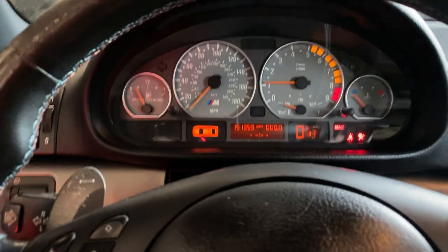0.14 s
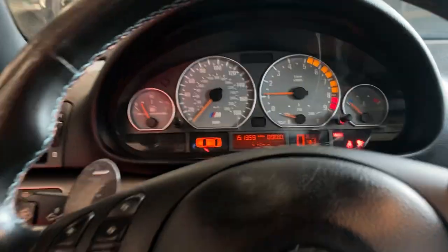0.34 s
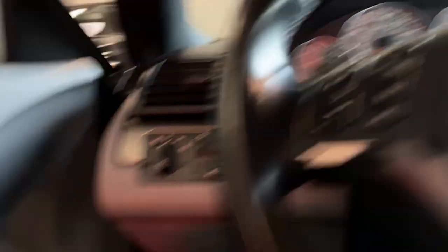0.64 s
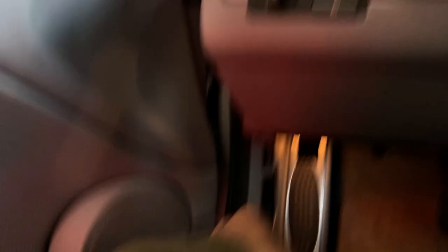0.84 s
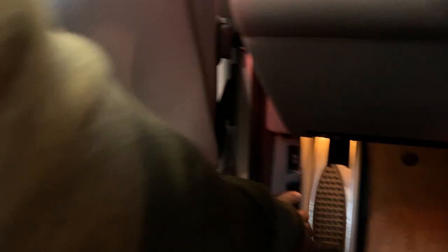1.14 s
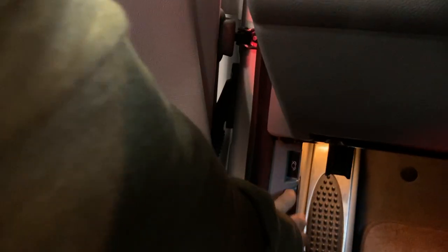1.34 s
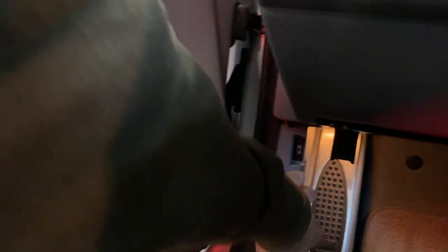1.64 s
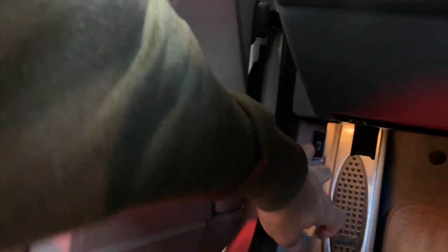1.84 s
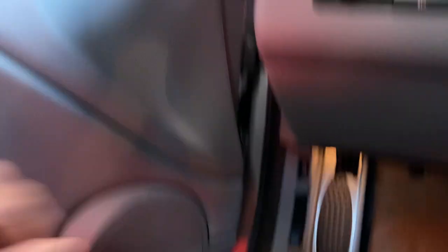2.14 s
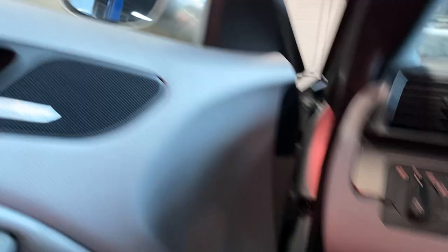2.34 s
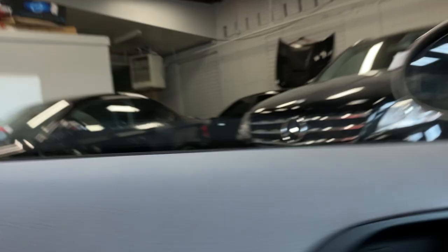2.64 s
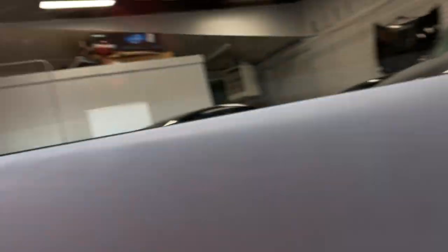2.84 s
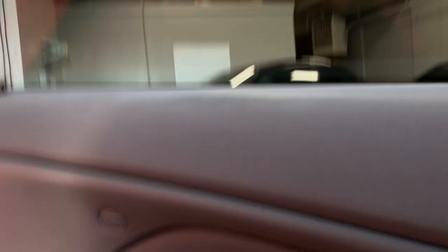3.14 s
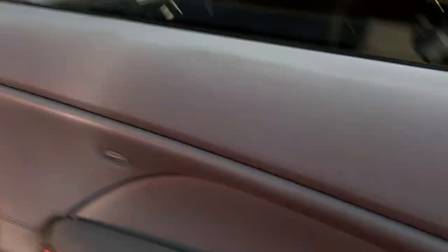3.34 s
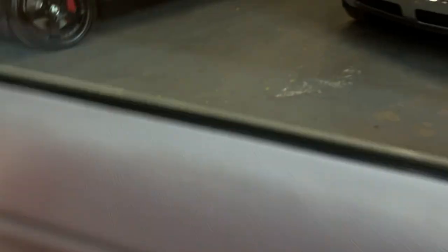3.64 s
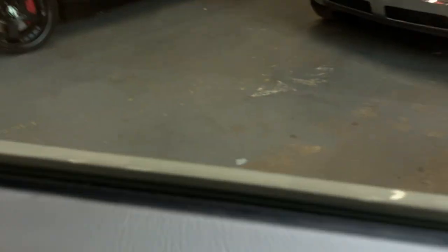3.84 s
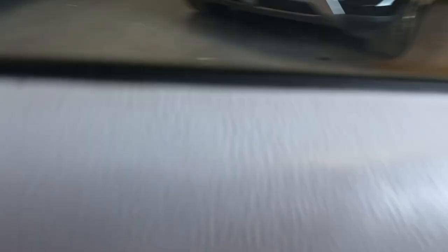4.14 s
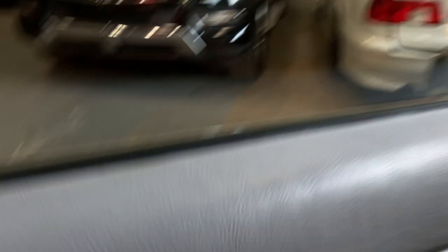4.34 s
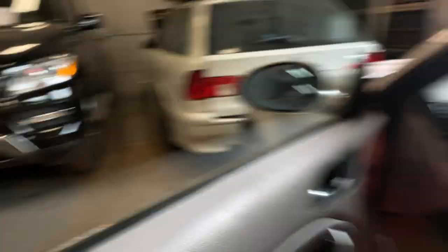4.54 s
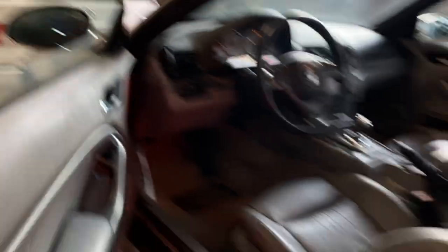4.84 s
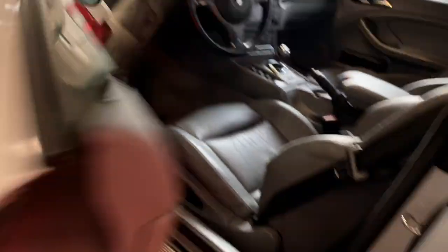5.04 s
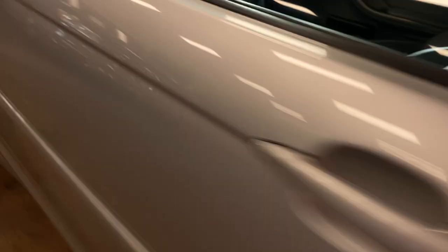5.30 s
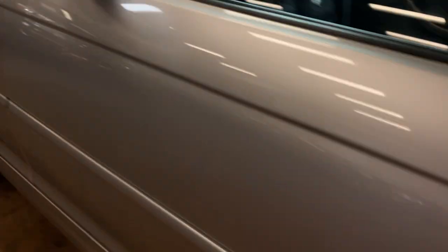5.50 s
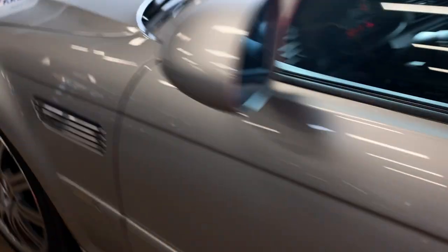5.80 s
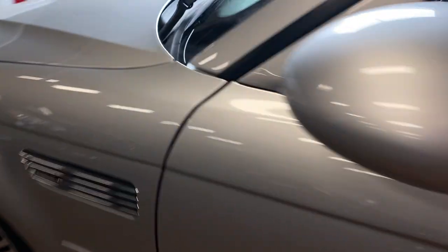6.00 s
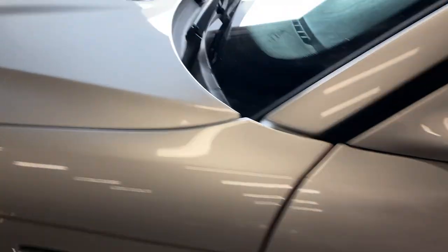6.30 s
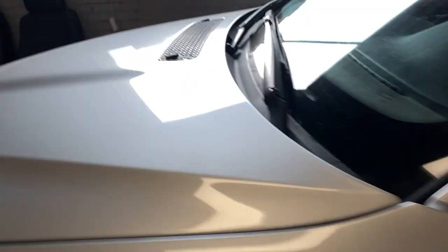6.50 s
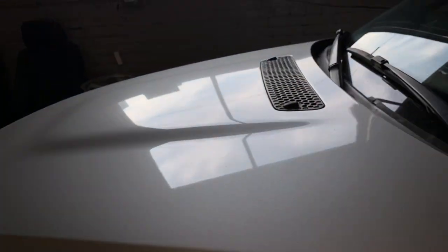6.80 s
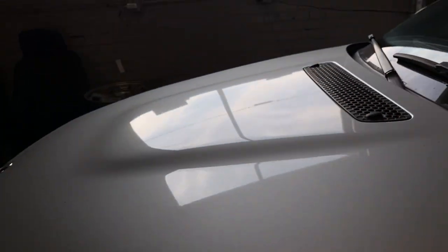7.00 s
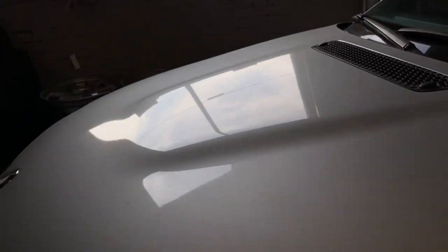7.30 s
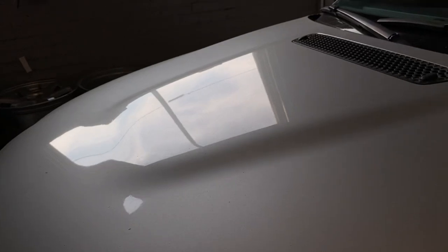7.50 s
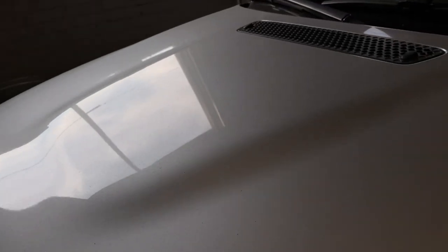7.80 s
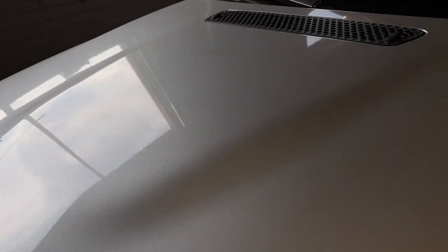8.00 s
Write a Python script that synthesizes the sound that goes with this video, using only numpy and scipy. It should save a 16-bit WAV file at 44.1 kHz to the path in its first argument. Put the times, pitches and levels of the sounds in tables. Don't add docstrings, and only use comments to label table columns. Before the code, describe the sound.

Inside a car, a six-cylinder engine idles with a smooth low boom. Trim ticks and cloth rustles, then a lever creaks, snaps and the bonnet pops with a heavy thunk. The door latch cracks, the door knocks open, then slams. Outside, valve clatter and belt whir grow brighter near the bonnet. Close handheld phone in a reverberant workshop, briefly ducking after the loud pop.

```python
import sys
import numpy as np
from scipy import signal
from scipy.fft import rfft, irfft, next_fast_len
from scipy.io import wavfile
from scipy.ndimage import uniform_filter1d, map_coordinates

SR = 44100
rng = np.random.default_rng(int(sys.argv[2]) if len(sys.argv) > 2 else 0)


def store_wav(level_fs):
    pcm = np.round(np.clip(np.atleast_2d(level_fs), -1, 1) * 32767)
    wavfile.write(sys.argv[1], SR, pcm.T.astype(np.int16))


def ratio(d):
    e = np.asarray(d, float) / 20
    return 10 ** e


N = 359415

# frequency in Hz, density in dB per Hz.
HISS_SPECTRUM = [(2500, -32), (4000, -3), (5500, -9), (7500, -10), (9500, -7.5), (10500, -6), (12000, -9.5),
                 (14000, -11), (15800, -18)]
# time in seconds, distance in m.
BAY_DISTANCE = [(0, 3.5), (5, 3.85), (6.4, 1.56), (7.45, 0.87), (8.15, 1.3)]


def unit(x):
    return x / np.sqrt(np.mean(x ** 2) + 1e-20)


def along(points, hz):
    f, v = np.transpose(points)
    return np.interp(np.log(hz + 1), np.log(f + 1), v)


def curve(rows):
    s, value = np.transpose(rows)
    return np.interp(np.arange(N) / SR, s, value)


def wobble(rate_hz):
    knots = rng.standard_normal(int(N * rate_hz / SR) + 4)
    return map_coordinates(knots, [np.arange(N) * rate_hz / SR])


def filtered(x, response):
    m = next_fast_len(N + SR // 2)
    return irfft(rfft(x, m) * response(np.fft.rfftfreq(m, 1 / SR)), m)[..., :N]


def peak(f, hz, width_hz):
    return 1j * f * width_hz / (hz * hz - f * f + 1j * f * width_hz)


def pair(spectrum, beat_db=0, patchy_db=1, size=512):
    # frequency in Hz, likeness of the ports (0 to 1).
    likeness = [(60, 0.93), (250, 0.47), (600, 0.19), (1500, 0.31), (4000, 0.077), (9000, 0.74), (14000, 1)]
    z = signal.stft(rng.standard_normal((2, N)) * ratio(beat_db), nperseg=size)[2]
    field = uniform_filter1d(rng.standard_normal(z.shape[1:]), size=3, axis=0)
    field = uniform_filter1d(field, size=10, axis=1)
    both = signal.istft(z * ratio(patchy_db * unit(field)), nperseg=size)[1][:, :N]

    def mid_side_response(hz):
        turn = np.arccos(np.clip(along(likeness, hz), 0, 1)) / 2
        return ratio(along(spectrum, hz)) * [np.cos(turn), np.sin(turn)]

    mid, side = filtered(both, mid_side_response)
    return unit(np.array([mid + side, mid - side]))


def spots(name):
    # centre in seconds, width in seconds, change in dB.
    order_spots = dict( second=(-42.5, [(.05, .2, -36), (2.35, 0.29, -8), (3.0, 0.45, 7), (5.0, 0.16, 10.5),
                   (6.2, 0.74, 13.5), (8.1, 0.54, 11.5)]), half=(-42, [(.2, .3, 3), (3.6, .35, 5),
                   (6.1, .3, -4), (7.7, 1, 11.5)]), third=(-35, [(.55, 0.17, -16), (1.3, 0.89, 3),
                   (2.8, 0.2, -3), (7.2, 0.99, -4.5)]), fourth=(-48.5, [(1.2, 0.62, 8), (6.9, 0.42, 12.5)]),
                   fifth=(-53, [(.05, .2, 12.5), (1.45, 0.081, 3), (3.2, 0.38, 8), (4.35, 0.34, 10.5),
                   (5.2, 0.23, 10), (6.0, 0.33, 10.5), (7.0, 0.5, 11)]))
    # centre in seconds, width in seconds, change in dB.
    part_spots = dict( pump=(-56.5, [(1.5, 0.74, 9), (4.5, 0.6, 7), (5.3, 0.52, 9.5), (7.3, 0.33, 9.5)]),
                  fan=(-59.5, [(1.3, 0.7, 14.5), (3.95, 0.19, 11.5), (4.6, 0.49, 6.5), (5.3, 0.35, 13.5),
                  (6.1, 0.4, 7), (7.0, 0.11, 9)]), alternator=(-12.5, [(3.4, .15, 9), (4.9, 0.85, 7),
                  (7.72, 0.21, 17.5), (8.1, 0.22, 15.5)]), rumble=(-35.5, [(.25, .35, -9), (1.4, .4, 3.5),
                  (4.0, 1, -3), (7.5, 0.53, -2.5)]))
    usual_db, rows = (order_spots | part_spots)[name]
    t = np.arange(N) / SR
    return usual_db + sum(db * np.exp(-((t - s) / width_s) ** 2) for s, width_s, db in rows)


def firing_boom(phase):
    # time in seconds, level in dB.
    first_order = [(0.15, -17), (.8, -25), (1.15, -20.5), (1.65, -26.5), (2.25, -23), (2.6, -28),
                   (2.9, -21.5), (3.3, -19.5), (3.75, -21), (4.5, -21), (5.35, -17.5), (5.73, -17.5),
                   (5.9, -22.5), (6.7, -18), (7.0, -20), (7.5, -18), (7.8, -19.5), (8.15, -17.5)]
    order_db = [curve(first_order)] + [spots(name) for name in ("second", "half", "third", "fourth", "fifth")]
    boom = np.zeros(N)
    for k, lag_turns, db in zip((1, 2, 2.5, 3, 4, 5), (0, .12, 0, .5, 0, .5), order_db):
        angle = k * phase + 0.17 * k * wobble(7) - 2 * np.pi * lag_turns
        boom += ratio(db + 0.21 * k * wobble(9)) * np.cos(angle)
    return boom


def tones(lines):
    t = np.arange(N) / SR
    return sum(ratio(db + 1.6 * wobble(8)) * np.sin(2 * np.pi * hz * t + wobble(12)) for hz, db in lines)


def accessories():
    # frequency in Hz, level in dB.
    belt_lines = [(587, -48), (612, -64), (845, -54), (915, -52.5), (1314, -54.5), (1389, -48.5),
                  (1809, -58.5)]
    # frequency in Hz, level in dB.
    alternator_lines = [(2137, -53), (2181, -62)]
    pump_hz, fan_hz = 305, 363.5
    t = np.arange(N) / SR
    pump = ratio(spots("pump") + 2.2 * wobble(1.5)) * np.sin(2 * np.pi * pump_hz * t + 0.49 * wobble(6.3))
    fan = ratio(spots("fan") + 3.62 * wobble(6)) * np.sin(2 * np.pi * fan_hz * t + 2.3 * wobble(4))
    whine = tones(belt_lines) / curve(BAY_DISTANCE)
    return pump + fan + whine + ratio(spots("alternator")) * tones(alternator_lines)


def valve_gear(phase):
    # frequency in Hz, density in dB per Hz.
    bay_spectrum = [(240, -39), (400, -10.5), (595, -1.5), (754, -8), (925, -4), (1210, -4.5), (1340, -6.5),
                    (1740, -2), (1950, -11), (2160, -4.5), (2320, -7), (4220, -14.5), (6000, -27),
                    (7800, -49), (13200, -120)]
    # frequency in Hz, density in dB per Hz.
    door_spectrum = [(300, -11), (450, -9), (690, -14.5), (850, -7.5), (1070, -8.5), (1740, -8.5),
                     (2450, -11), (4420, -17), (6000, -29.5), (8000, -62)]
    # time in seconds, level in dB re open air.
    path = [(0, -11), (.55, -10), (1.0, -5.5), (1.65, -11), (2.3, -3), (2.85, -2.5), (3.9, -4), (4.3, -2.5),
            (5.4, -1), (7.5, 1), (8.15, 0)]
    open_db = curve(path)
    gear_gain = ratio(-40.5 + 0.95 * open_db)
    beat = np.cos(phase) + 0.72 * np.cos(phase / 3) + wobble(16)
    bay_share = np.clip(1 - np.log(curve(BAY_DISTANCE)) / 1.37, 0, 1)
    bay = np.sqrt(bay_share) * pair(bay_spectrum, 0.5 * beat, patchy_db=3, size=2048)
    door = np.sqrt(1 - bay_share) * pair(door_spectrum, 0.66 * beat, patchy_db=3.5, size=1024)
    hiss = ratio(-47 + 0.99 * open_db) * pair(HISS_SPECTRUM, 1.04 * beat, patchy_db=-1.5)
    return gear_gain * (bay + door) + hiss


def block_rumble(phase):
    # frequency in Hz, density in dB per Hz.
    spectrum = [(20, -28), (38, -18), (75, -0.5), (100, -4), (160, -4.5), (250, -5.5), (340, -13.5),
                (450, -17.5), (700, -22), (1200, -50.5)]
    return ratio(spots("rumble")) * pair(spectrum, 2.7 * np.cos(phase / 2), patchy_db=1.5)


def engine():
    firing_hz = 57.2 + 0.2517 * wobble(2)
    phase = 2 * np.pi * np.cumsum(firing_hz) / SR
    tonal = firing_boom(phase) + accessories()
    return np.sqrt(2) * tonal + block_rumble(phase) + valve_gear(phase)


def burst(t60_s, attack_s, t):
    return rng.standard_normal(len(t)) * ratio(-60 * t / t60_s) * (1 - np.exp(-t / attack_s))


def add(out, s, sound, pan_db):
    gain = ratio([[pan_db / 2 + 5.0], [-pan_db / 2 + 0.5]])
    out[:, round(s * SR):][:, :len(sound)] += sound * gain


def thumps():
    # start in seconds, level in dB, hardness in dB per octave.
    kick_panel = ([(105.5, 0.5, 0.07), (74, -6, 0.2), (191, -2, 0.01), (321, -16, 0.14)], [(1.726, -21, 5),
                  (1.742, -16.5, -2), (1.756, -13, -2), (1.775, -16, -3), (1.84, -20.5, 0.5),
                  (1.857, -13.5, -6), (1.889, -18, -6)])
    bonnet = ([(244, 0, 0.032), (520, 0, 0.031)], [(1.931, -13.5, .1)])
    door_stop = ([(195, -0.5, .04), (246.7, -8.5, 0.16), (427, -7, 0.035), (634, -14, 0.073),
                 (830, -21.5, .04)], [(3.912, -7.5, 0.033333), (3.927, -7.5, 1.1)])
    door_swing = ([(72, -3.5, 0.25), (97, -2.5, 0.12), (227, -4.5, 0.082), (380, -12.5, .034)],
                  [(3.999, -21.5, 2.5), (4.02, -27.5, 4.5), (4.047, -14.5, -1.5)])
    door_slam = ([(66.7, -2.5, 0.22), (122.6, -1.5, 0.11), (202, -1.5, 0.045), (347, -0.5, 0.022),
                 (477, -18.5, 0.09), (753, -19, 0.043)], [(5.51, -18.5, 6), (5.538, -10.5, 0),
                 (5.576, -15.5, 1.5)])
    out, t = np.zeros((2, N + SR)), np.arange(SR // 2) / SR
    for modes, blows in (kick_panel, bonnet, door_stop, door_swing, door_slam):
        lowest_hz = modes[0][0]
        for s, db, hardness in blows:
            ring = np.zeros(len(t))
            for hz, level_db, t60_s in modes:
                mode_db = level_db + hardness * np.log2(hz / lowest_hz)
                ring += ratio(mode_db - 60 * t / t60_s) * np.sin(2 * np.pi * hz * t)
            add(out, s, ratio(db + 4.5) * ring * (1 - np.exp(-t / 0.0019)), -4.4)
    return out[:, :N]


def snaps():
    # start in seconds, peak in dB, centre in Hz, crack in dB, t60 in seconds.
    contacts = [(1.225, -14.5, 1940, -7, 0.025), (1.724, -30, 1800, -30, .044),
                (1.92, -22.5, 2060, -16, 0.076), (1.928, -8, 2040, -21, 0.044),
                (1.938, -12.5, 1200, -8, 0.016), (2.588, -9, 2370, 4, 0.014), (3.917, -32, 3200, -35, .047),
                (4.0, -29.5, 3970, 0.5, 0.22), (5.507, -11.5, 2670, -22.5, 0.042),
                (5.515, -12.5, 2720, -1, 0.067), (5.528, -20, 1990, -7, 0.13),
                (5.546, -16, 2770, 2.5, 0.069), (5.57, -31, 2000, -9, .17)]
    # frequency in Hz, width in Hz, level in dB.
    part_rings = [(530, 316, 5), (1350, 130, -23), (1620, 80, -9), (2570, 280, -20)]
    out, t = np.zeros((2, N + SR)), np.arange(SR // 5) / SR
    f = np.fft.rfftfreq(len(t), 1 / SR)
    rings = 0.94 + sum(ratio(db + 12) * peak(f, hz, width_hz) for hz, width_hz, db in part_rings)
    for s, db, hz, bright_db, t60_s in contacts:
        body = rfft(burst(t60_s, 0.0017, t)) * peak(f, hz, 0.79 * hz) * rings
        crack = rfft(burst(0.53 * t60_s, 0.0034, t)) * peak(f, 9300, 14000) * ratio(bright_db)
        add(out, s, ratio(db + 6.0) * irfft(body + crack, len(t)), -4.3)
    return out[:, :N]


def ticks():
    # start in seconds, peak in dB, ring in Hz.
    crisp = [(.275, -24, 710), (.297, -23.5, 1170), (.771, -19.5, 860), (.843, -20, 886),
             (.894, -22.5, 1030), (.949, -24.5, 790), (1.104, -24, 892), (1.159, -24, 680),
             (1.372, -24.5, 1090), (2.254, -25, 625), (2.422, -24, 913), (2.675, -27, 600),
             (3.989, -19.5, 670)]
    # start in seconds, peak in dB, ring in Hz.
    dull = [(1.007, -23, 743), (1.138, -17, 795), (1.549, -25.5, 1607), (1.567, -23.5, 1680),
            (1.589, -26, 1350), (2.174, -20, 850), (2.273, -25, 990), (2.296, -40, 1040), (2.33, -31, 1300),
            (2.787, -26, 933), (2.918, -21, 845), (3.231, -24, 2177), (4.703, -21, 950)]
    t60_s = 0.034
    out, t = np.zeros((2, N + SR)), np.arange(SR // 5) / SR
    f = np.fft.rfftfreq(len(t), 1 / SR)
    for rows, crack_db in ((crisp, -1), (dull, -38)):
        for s, db, hz in rows:
            ring = rfft(burst(t60_s, 0.00092, t)) * peak(f, hz, 166) * ratio(13.5)
            crack = rfft(burst(0.19 * t60_s, 0.00053, t)) * peak(f, 3000, 5200) * ratio(crack_db + 0.5)
            add(out, s, ratio(db) * irfft(ring + crack, len(t)), -4.4)
    return out[:, :N]


def stroke(s, length_s):
    rise, fall, edge_db = 0.2, 0.32, 10.5
    u = (np.arange(N) / SR - s) / length_s
    outside = np.maximum(1 - u / rise, 1 - (1 - u) / fall)
    return ratio(-edge_db * np.clip(outside, 0, 5))


def cable():
    # start in seconds, length in seconds, level in dB.
    squeals = [
        (1.574, 0.093, -32),
        (1.66, 0.047, -42),
        (1.719, 0.021, -28),
        (1.745, 0.053, -29),
    ]
    # frequency in Hz, width in Hz, level in dB.
    steel = [(1380, 38, 14.5), (1700, 38, 2), (2560, 55, -1), (3040, 36, -15)]
    slips = rng.standard_normal(N) * ratio(4 * wobble(60))
    ring = filtered(slips, lambda f: sum(ratio(db) * peak(f, hz, width_hz) for hz, width_hz, db in steel))
    return sum(ratio(db) * stroke(s, length_s) for s, length_s, db in squeals) * unit(ring)


def rubbing():
    # start in seconds, length in seconds, level in dB, centre in Hz,
    # fibre hiss in dB.
    strokes = [(0.259, 0.062, -46, 1190, -74), (0.444, 0.28, -53.5, 2180, -66),
               (0.692, 0.32, -38.5, 1070, -60), (1.097, .13, -36, 880, -38), (1.24, 0.13, -58, 1100, -46),
               (1.523, 0.19, -42, 1430, -68.5), (2.13, 0.43, -35.5, 900, -64),
               (2.556, 0.37, -67, 1300, -50), (2.88, 0.24, -43.5, 1240, -64),
               (3.985, 0.086, -39.5, 1700, -34), (4.523, 0.1, -37, 1860, -32.5),
               (4.672, 0.1, -33.5, 1000, -43), (4.755, 0.086, -37.5, 1310, -42.5),
               (4.843, 0.083, -57, 1600, -42), (0.763, .22, -44, 2300, -58), (1.72, .2, -41.5, 750, -70),
               (6.018, 0.14, -41.5, 1530, -52)]
    shapes = np.array([stroke(s, length_s) for s, length_s, *_ in strokes])
    rub_db, centre_hz, fibre_db = np.transpose(strokes)[-3:]
    centre_hz = centre_hz[shapes.argmax(axis=0)]
    grains = rng.standard_normal(N) * ratio(2.2 * wobble(70) + 3 * wobble(300))
    body = np.zeros(N)
    for hz in (700, 1000, 1400, 1900, 2600):
        nearness = np.exp(-(np.log(centre_hz / hz) / 0.34) ** 2)
        body += nearness * unit(filtered(grains, lambda f: peak(f, hz, 0.35 * hz) ** 2))
    wide = unit(filtered(grains, lambda f: peak(f, 2000, 1200)))
    rub = ratio(rub_db - 2.0) @ shapes * (0.75 * body + 0.33 * wide)
    fibre = ratio(fibre_db - 7.0) @ shapes * pair(HISS_SPECTRUM, 3.2 * wobble(90), patchy_db=1.5)
    return rub + fibre


def shop(x):
    # frequency in Hz, t60 in seconds.
    decay = [(100, 0.75), (1000, 0.16), (4000, 0.076), (12000, 0.071)]
    hz, t, z = signal.stft(rng.standard_normal((2, SR // 2)), SR, nperseg=256)
    tail = signal.istft(z * ratio(-60 * t / along(decay, hz)[:, None]), SR, nperseg=256)[1]
    delayed = np.pad(x, ((0, 0), (300, 0)))
    return signal.fftconvolve(delayed, tail / np.linalg.norm(tail[0]), axes=1)[:, :N]


def ports(x, lead):
    # frequency in Hz, left over right in dB.
    tilt = [(60, -5), (110, -7.5), (200, -5), (380, -9.5), (700, 0.5), (1290, -4), (2380, -3.5),
            (4400, -3.0), (8120, -2.5), (15000, 2)]
    half = np.array([[.5], [-.5]])
    return filtered(x, lambda hz: ratio(half * along(tilt, hz)) * np.exp(1j * half * along(lead, hz)))


def ducking():
    # start in seconds, hold in seconds, release in seconds, deep bass in dB, rest in dB.
    ducks = [
        (1.681, 0.18, 0.037, -14, 1.4),
        (1.928, 0.064, 0.11, -41, -11),
        (5.579, 0.043, 0.043, -10.5, 0.5),
    ]
    attack_s = 0.053
    t = np.arange(N) / SR
    dips = []
    for s, hold_s, release_s, *_ in ducks:
        down = (t - s) / attack_s
        up = 1 + (s + attack_s + hold_s - t) / release_s
        dips.append(np.clip(np.minimum(down, up), 0, 1))
    return np.transpose(ducks)[-2:] @ np.array(dips)


def scene():
    # frequency in Hz, left port lead in radians.
    far_lead = [(0, -3), (340, 0.5), (600, 2.02), (1030, 1.87), (3530, 10), (6030, 19.5), (6550, 15.5),
                (7410, 24.5), (9390, 19.5), (11800, 16.0), (12700, -22), (13200, 34), (14600, -10),
                (15300, 39)]
    # frequency in Hz, left port lead in radians.
    hand_lead = [(30, -0.71), (150, -0.81), (300, -1.14), (550, -2.07), (900, -1.93), (1500, -1.44),
                 (4000, -1.13), (15000, -1.86)]
    knocks = thumps() + snaps() + ticks()
    far = engine() + ratio(-13.5) * shop(knocks)
    near = knocks + cable() + rubbing()
    return ports(far, far_lead) + ports(near, hand_lead)


def band_limit(x):
    return signal.sosfilt(signal.butter(12, 15750, fs=SR, output="sos"), x)


def record(dry):
    # frequency in Hz, level in dB.
    mic = [(20, 0.5), (11300, 0), (11800, -10), (12150, -24), (12500, -13), (13200, -7.5), (15000, -12.5),
           (15700, -14), (15900, -60)]
    bass = filtered(dry, lambda hz: 1 / (1 + (hz / 130) ** 4))
    treble = filtered(dry, lambda hz: ratio(along(mic, hz))) - bass
    bass = filtered(bass, lambda hz: hz ** 6 / (hz ** 6 + 32 ** 6))
    bass_db, treble_db = ducking()
    x = bass * ratio(bass_db) + treble * ratio(treble_db)
    x = x / (1 + np.abs(x / .93) ** 6) ** (1 / 6)
    return band_limit(x)


dry = scene()
out = record(dry)
store_wav(out)
```